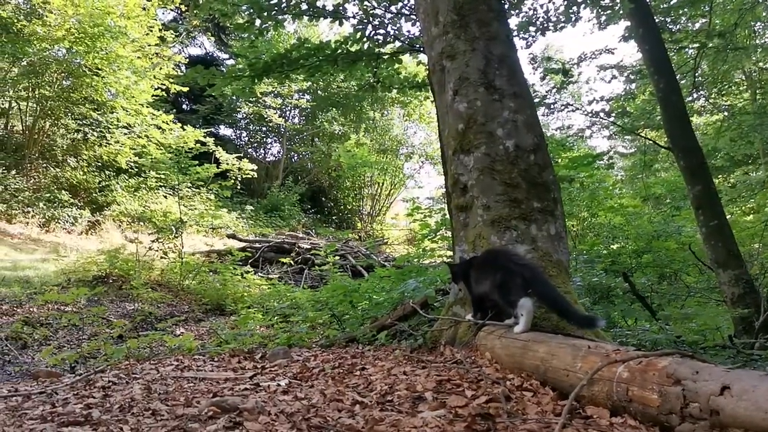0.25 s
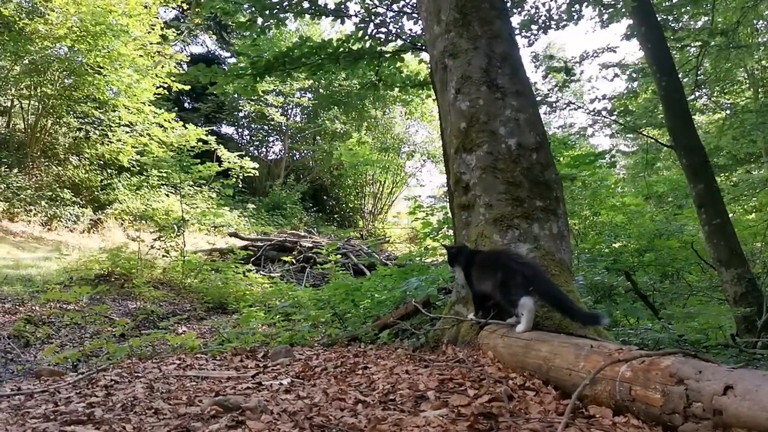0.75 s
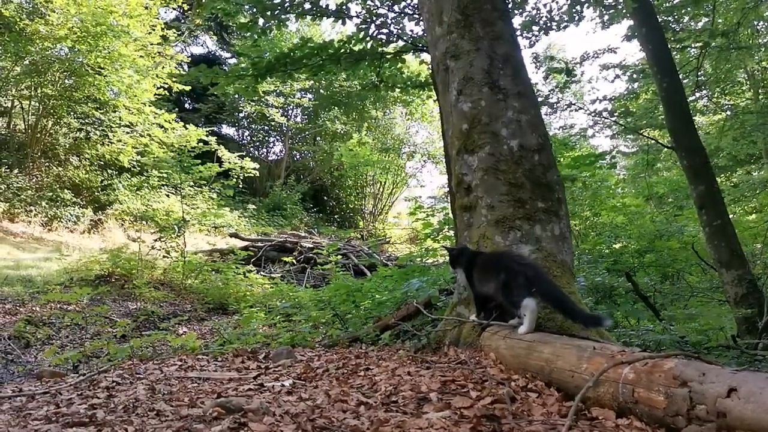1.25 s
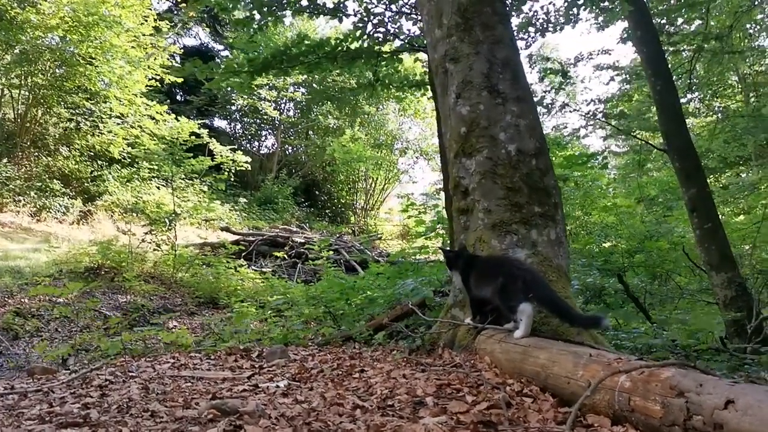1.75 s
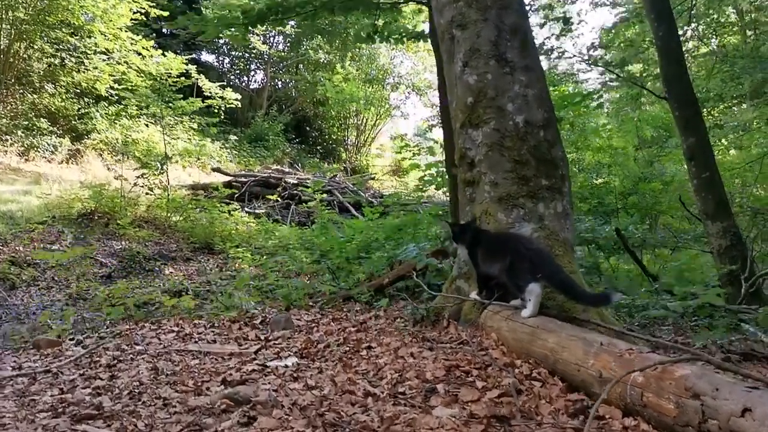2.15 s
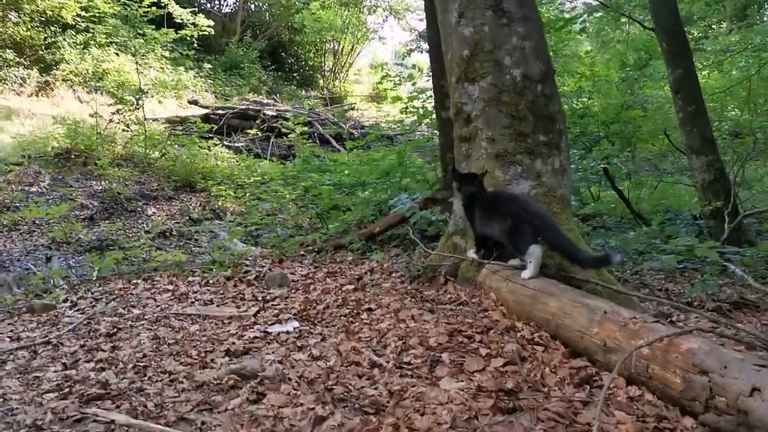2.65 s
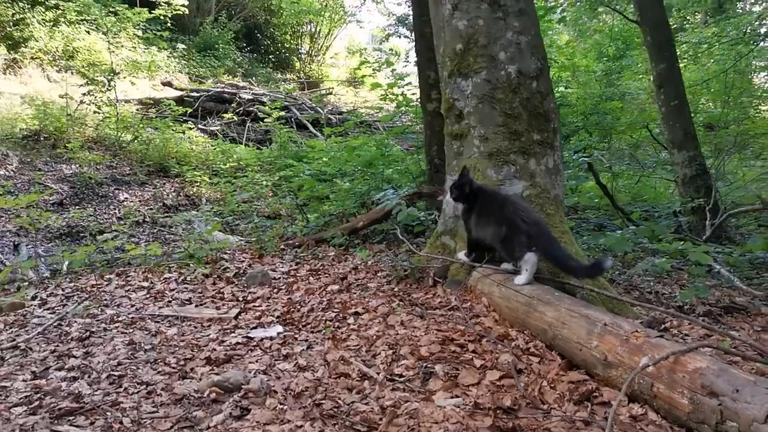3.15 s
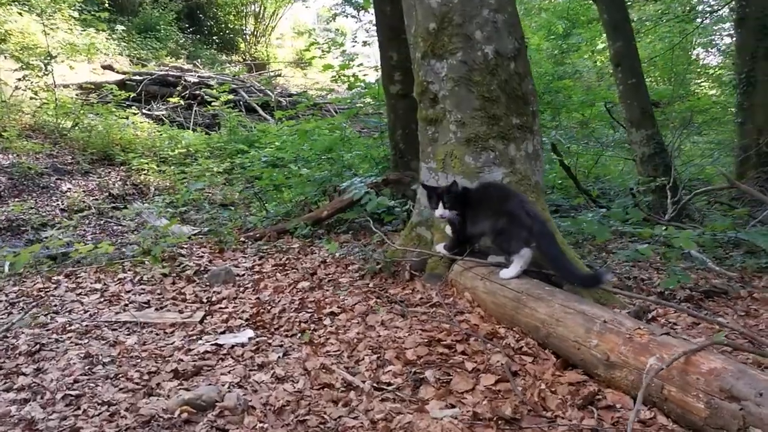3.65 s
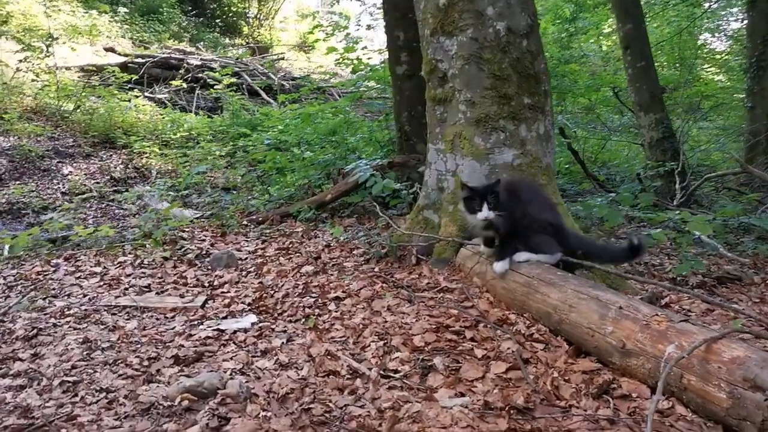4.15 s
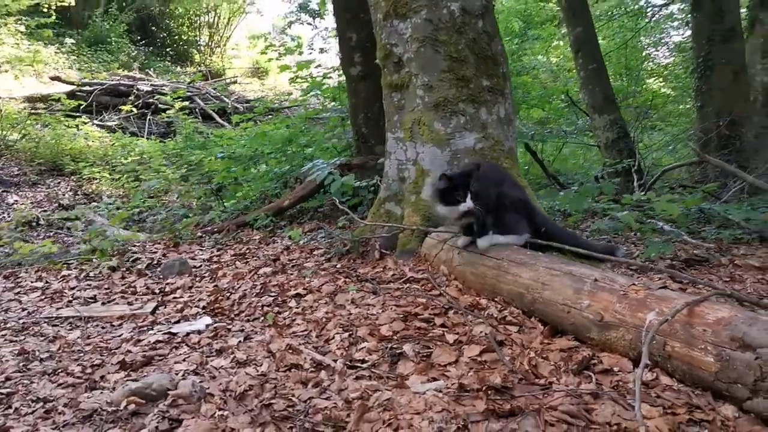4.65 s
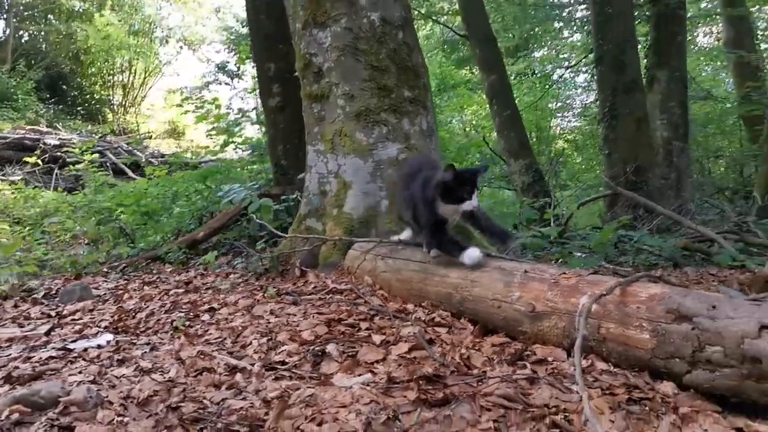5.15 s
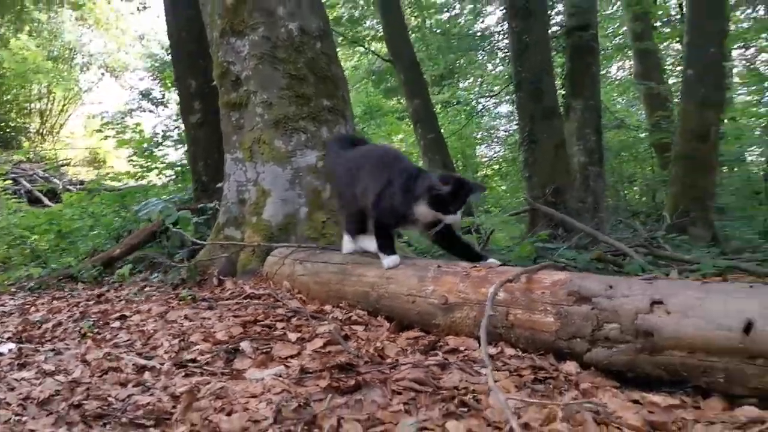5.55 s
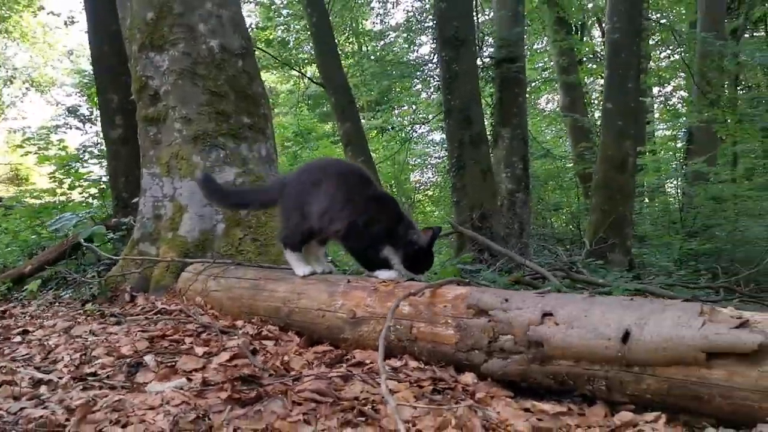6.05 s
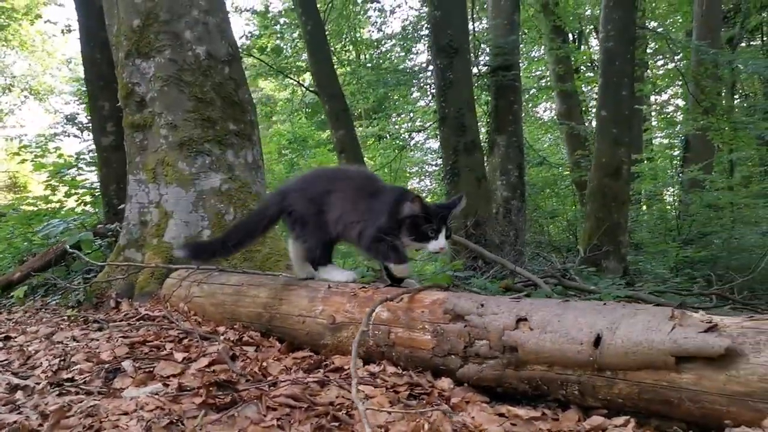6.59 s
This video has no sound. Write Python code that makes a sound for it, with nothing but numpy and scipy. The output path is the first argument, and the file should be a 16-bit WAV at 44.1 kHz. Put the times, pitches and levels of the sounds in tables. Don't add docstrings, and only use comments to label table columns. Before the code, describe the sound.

Outdoors among trees, a hand-held stereo recorder picks up soft low wind and a wash of foliage. A warbler whistles and small birds chirp with a diffuse woodland echo. Dull knocks on the case come early, the sharpest just after one second. From about two to nearly six seconds, close dry leaves crackle with hollow pops and brittle snaps, beneath finch song and buzzy calls. It ends quieter, with faint birds.

```python
import sys
import numpy as np
from scipy import signal
from scipy.fft import rfft, irfft, next_fast_len
from scipy.io import wavfile

SR = 44100
rng = np.random.default_rng(int(sys.argv[2]) if len(sys.argv) > 2 else 0)


def store_pcm(level_fs):
    pcm = np.round(np.clip(level_fs, -1, 1) * 32767).astype(np.int16)
    wavfile.write(sys.argv[1], SR, np.atleast_2d(pcm).T)


def undo_db(level):
    steps = np.asarray(level, float) / 20
    return 10 ** steps


N = 300762
PAD = next_fast_len(N + SR)
BINS_HZ = np.maximum(np.arange(PAD // 2 + 1) * SR / PAD, 1)

# time in seconds, level in dB.
GUSTS = [(0.0, -69), (0.42, -68.5), (0.7, -60.5), (1.05, -69), (1.71, -60), (2.11, -57.5), (2.55, -65.5),
         (3.3, -63), (3.76, -66), (4.05, -62.5), (4.67, -61.5), (4.82, -56.5), (5.17, -65.5), (5.58, -66),
         (5.98, -61), (6.82, -69)]
# frequency in Hz, density in dB per Hz.
RUMBLE_COLOUR = [(8.8, -42), (15, 1), (70, 0), (106, -4), (134, -7), (270, -19), (336, -18), (500, -21),
                 (650, -57.5), (1100, -120)]
# frequency in Hz, density in dB per Hz.
WOOD_COLOUR = [(88, -41), (150, -3), (303, -9), (1120, -10), (1440, -11.5), (2210, -11), (3020, -10.5),
               (3660, -7.5), (4540, -19), (5630, -17), (7250, -19), (8810, -36), (11800, -39), (14300, -39),
               (15800, -59)]
# time in seconds, gain in dB.
CHORUS_GAIN = [
    (0, 7.5),
    (.6, -1),
    (1.4, -1),
    (1.8, 4.5),
    (2.3, 15.5),
    (3.8, 4.5),
    (5.0, 14),
    (5.9, 6.5),
    (6.4, 13.5),
    (6.82, 10),
]
# start in seconds, length in seconds, start pitch in Hz,
# end pitch in Hz, peak in dB.
WARBLER_HOLDS = [(0.268, 0.023, 2290, 2310, -56), (0.725, 0.054, 3760, 3170, -55),
                 (.772, 0.04, 3200, 3057, -55.5), (0.855, 0.06, 3040, 3250, -57.5),
                 (.42, 0.048, 2770, 3130, -61), (.24, 0.047, 2980, 3330, -64),
                 (1.11, 0.37, 2012, 2052, -69.5), (1.31, 0.058, 3410, 2980, -57),
                 (1.4, 0.069, 3660, 3576, -51.5), (1.725, 0.15, 2904, 3091, -55.5),
                 (1.75, 0.11, 2340, 2440, -63.5), (2.075, 0.071, 3870, 4080, -61.5),
                 (2.15, 0.051, 3920, 3620, -54), (2.92, 0.17, 1858, 2023, -59.5),
                 (3.68, 0.079, 2600, 2013, -53.5), (3.77, 0.11, 3042, 3363, -45),
                 (5.62, 0.11, 4050, 3860, -67), (5.74, 0.14, 3200, 3285, -67.5),
                 (6.42, 0.28, 3550, 3580, -74.5), (1.95, 0.05, 3010, 2810, -60)]
WARBLER_SLIDES = [(0, 0.052, 4034, 3990, -58.5), (0, 0.048, 2873, 2950, -64),
                  (0.083, 0.085, 3380, 3564, -52), (0.15, 0.066, 3780, 2890, -54),
                  (0.36, 0.051, 3074, 2605, -53), (0.487, 0.042, 3673, 3670, -55),
                  (0.93, 0.036, 4090, 3710, -56.5), (1.0, 0.17, 2870, 2934, -64),
                  (1.31, 0.046, 4420, 4200, -65.5), (1.527, 0.053, 2720, 2475, -54),
                  (1.88, 0.05, 3500, 2860, -58.5), (2.265, 0.06, 2510, 2756, -60),
                  (3.6, 0.043, 3270, 3100, -45.5), (6.0, 0.14, 2850, 3040, -64.5),
                  (6.5, 0.063, 2780, 2650, -68.5), (6.63, 0.098, 2720, 2740, -72.5),
                  (6.05, 0.15, 5320, 5390, -66)]
# start in seconds, length in seconds, start pitch in Hz,
# end pitch in Hz, peak in dB.
CROWN_CALLS = [(0.0, 0.054, 7450, 7200, -56.5), (0.58, 0.041, 5390, 5790, -61), (.76, .04, 8400, 8500, -78),
               (.91, 0.056, 8430, 9160, -77), (.96, 0.037, 9000, 8800, -81), (3.8, 0.16, 7630, 6950, -63),
               (1.064, 0.05, 5850, 6780, -52), (1.068, 0.055, 5350, 6630, -50.5),
               (1.03, .07, 7500, 7570, -72), (1.3, 0.06, 8450, 8000, -81), (4.235, 0.025, 7500, 7400, -62),
               (6.06, 0.048, 5700, 6500, -66), (6.74, .075, 6050, 5760, -68), (1.3, 0.052, 7200, 7340, -74),
               (1.345, 0.043, 7150, 6380, -65), (1.75, 0.062, 4820, 5160, -69),
               (2.008, 0.05, 7350, 6730, -50), (2.04, .035, 6700, 5900, -52),
               (5.83, 0.086, 7200, 7180, -68.5), (5.84, 0.072, 5720, 5900, -66.5),
               (6.06, 0.044, 7100, 7760, -60.5), (6.3, 0.072, 5630, 5300, -68),
               (6.46, 0.14, 5400, 5400, -64), (6.63, 0.1, 5820, 5720, -64.5), (6.44, 0.24, 7200, 7170, -64),
               (6.62, 0.19, 7200, 7550, -67)]
# start in seconds, length in seconds, top pitch in Hz, peak in dB.
ARCHED_CALLS = [
    (0.718, 0.12, 7580, -63.5),
    (0.888, 0.112, 7660, -65.5),
    (1.1, 0.055, 7720, -60),
]
# start in seconds, peak in dB.
ALARM_CHIPS = [
    (0.064, -39),
    (0.1706, -41.5),
]
# time in seconds,
# signed size, knock in Hz, boom against the knock in dB.
FINGER_KNOCKS = [(0.629, -0.017, 413, -7.5), (0.686, .006, 295, 1), (1.283, 0.1, 630, -9),
                 (1.2868, -0.26, 432, -18), (1.6405, -0.028, 403, -6.5), (1.7391, 0.019, 607, 0),
                 (1.866, 0.027, 520, -9), (.14, .002, 198, 11.5), (1.945, .002, 199, 11),
                 (1.977, .003, 195, 11.5), (2.04, .002, 199, 12), (2.415, .002, 200, 15),
                 (4.287, .003, 197, 10.5), (2.112, 0.036, 510, -15), (2.2167, -0.23, 560, -9.5),
                 (2.388, .002, 200, 13.5), (2.931, .003, 194, 13), (3.354, 0.08, 950, -21),
                 (3.44, 0.068, 860, -21.5), (4.088, .004, 190, 10), (4.744, 0.0098, 338, -0.5),
                 (5.256, 0.0082, 317, 1)]
# time in
# seconds, pitch in Hz, peak in dB.
HOLLOW_POPS = [(3.108, 1510, -41), (3.176, 610, -34.5), (3.223, 1900, -44), (3.265, 1310, -44),
               (3.281, 800, -35.5), (3.291, 1600, -38), (3.311, 1100, -44), (3.382, 800, -41),
               (3.398, 1500, -33), (3.407, 1000, -35), (3.424, 1150, -29.5), (3.496, 1510, -42),
               (3.985, 1450, -41), (4.137, 1600, -37), (4.712, 1500, -38), (4.735, 1400, -38),
               (4.784, 1200, -41), (4.797, 1300, -34.5), (4.845, 1000, -41), (4.894, 1100, -30.5),
               (4.965, 1800, -44), (5.215, 1730, -43), (5.506, 1800, -29.5), (5.618, 1200, -47),
               (2.05, 740, -49), (1.267, 1000, -55), (3.354, 7400, -23), (.629, 1500, -43),
               (.631, 890, -44), (1.286, 3020, -40), (3.198, 1800, -39), (5.1068, 1630, -32),
               (5.1069, 3300, -25), (3.754, 5200, -52)]
# time in seconds, low body in dB, crack in dB.
TWIG_BREAKS = [(1.8758, -67, -54), (1.9295, -60, -42), (2.3091, -51, -38), (3.4965, -42, -42),
               (3.9846, -44, -50), (4.7648, -39, -31), (4.9887, -50, -41), (5.1068, -27, -22),
               (5.1738, -51, -50), (5.215, -43, -46), (5.5435, -35, -31), (0.6727, -68, -63),
               (5.6784, -68, -54), (5.751, -60, -47), (6.1872, -54, -56), (4.7715, -48, -41),
               (4.7845, -50, -42), (4.806, -48, -42), (4.828, -52, -44), (4.9145, -55, -44),
               (5.2245, -50, -47), (5.4165, -54, -43), (5.4452, -44, -35), (5.5155, -50, -38),
               (5.577, -50, -46), (3.121, -50, -41), (3.415, -52, -41), (3.486, -54, -44),
               (3.649, -56, -44), (4.31, -62, -52), (4.333, -60, -50), (5.0955, -52, -48)]
# time in seconds, low body in dB, crack in dB.
STALK_BREAKS = [(2.1614, -52, -62), (2.3185, -53, -46), (2.3871, -63, -52), (2.6923, -57, -44),
                (2.802, -58, -70), (3.1854, -43, -50), (3.2814, -44, -38), (3.3542, -41, -41),
                (3.5574, -39, -37), (4.1359, -48, -52), (4.1655, -50, -45), (4.4268, -53, -37),
                (4.734, -49, -47), (4.7961, -44, -43), (4.9345, -35, -32), (5.0263, -53, -38),
                (5.0749, -56, -45), (5.0787, -42, -34), (5.1018, -35, -29), (5.1286, -40, -38),
                (5.3767, -47, -44), (5.4034, -50, -41), (5.4271, -44, -38), (5.4474, -43, -31),
                (6.2979, -54, -45), (6.4136, -50, -43)]
# low edge in Hz, high edge in Hz.
BREAK_BANDS_HZ = [(280, 4000), (4000, 7600), (8500, 15000)]
# start in seconds, length in seconds, pitch in Hz, warble depth in Hz, peak in dB.
BUZZY_NOTES = [(1.101, 0.034, 6530, 200, -44.5), (2.0, 0.11, 6850, 545, -47), (2.04, 0.12, 5450, 475, -65),
               (2.946, 0.098, 2834, 240, -54), (3.1, 0.54, 3430, 599, -49), (3.13, .06, 3000, 120, -56),
               (3.24, .07, 3080, 130, -54), (3.439, 0.051, 3150, 120, -54.5), (3.619, 0.24, 2600, 404, -55),
               (3.96, 0.086, 3605, 470, -47), (4.118, 0.11, 5580, 470, -49), (3.4, 0.12, 3600, 532, -58),
               (4.368, 0.084, 4194, 313, -50.5), (4.355, 0.11, 6850, 440, -47),
               (6.065, 0.13, 7120, 610, -56), (6.185, 0.056, 3800, 220, -62.5),
               (7.3, 0.27, 7150, 390, -61.5), (5.6, .04, 2800, 231.5, -59), (3.925, 0.084, 4600, 570, -52),
               (4.3, .09, 5550, 150, -54), (4.27, 0.045, 2800, 324, -56), (5.95, 0.07, 3250, 160, -66)]
# start in seconds, hold in seconds, crackle in dB, low crunch in dB.
TREADS = [(2.317, 0.47, -75, -73.5), (2.49, 0.046, -63.5, -63), (3.122, 0.018, -59.5, -53.5),
          (3.157, 0.13, -65.5, -56.5), (3.277, .01, -61.5, -49.5), (3.383, 0.069, -61.5, -51.5),
          (3.477, 0.13, -61.5, -58.5), (3.7, 0.34, -80, -72), (4.108, 0.31, -73, -70),
          (4.403, 0.072, -68, -58), (4.632, 0.12, -70.5, -59.5), (4.754, 0.16, -63.5, -56.5),
          (4.957, 0.14, -70.5, -68.5), (5.179, 0.3, -71, -66.5), (5.436, 0.098, -61.5, -56.5),
          (5.54, 0.022, -65, -61.5), (5.734, 0.28, -83.5, -75)]
# frequency in Hz, density in dB per Hz.
CRACKLE_COLOUR = [(880, -33), (1500, -12), (2160, -20), (3570, -3), (3940, 1), (4300, -7), (5090, -4),
                  (7180, -5.5), (10700, -28.5), (12200, -37), (14900, -29), (15800, -56)]
# frequency in Hz, density in dB per Hz.
CRUNCH_COLOUR = [(150, -50), (250, -22), (285, -21), (480, -1.5), (2160, -1.5), (2400, 0), (3120, -2.5),
                 (5280, -120)]
LEAF_EDGES_HZ = [100, 900, 1700, 3000, 4500, 6000, 7600, 16000]
# delay in seconds, length in seconds, start pitch in Hz,
# end pitch in Hz, relative level in dB.
SYLLABLE_PARTS = [
    (0, 0.026, 6620, 4900, 0),
    (0.023, 0.0136, 5400, 7200, 1),
    (0.039, .04, 7200, 7340, -10),
    (0.05, .03, 4600, 4550, -3),
    (0.083, 0.03035, 4300, 3830, -7.5),
]
# start in seconds, peak in dB.
HIGH_SYLLABLES = [
    (2.446, -46.5),
    (2.595, -41),
    (2.744, -39),
]
# start in seconds, top pitch in Hz, peak in dB.
LOW_SYLLABLES = [
    (2.9, 4275, -42),
    (3.06, 4565, -41.5),
    (3.205, 4530, -47),
    (3.347, 5200, -45.5),
]
# start in seconds, peak in dB.
FLICKS = [
    (2.854, -48),
    (2.919, -44),
    (3.01, -42),
    (3.09, -39.5),
]
# start in seconds, length in seconds, start pitch in Hz, end pitch in Hz, peak in dB.
FLOURISH = [
    (2.346, 0.015, 5130, 4560, -47.5),
    (2.804, 0.083, 4790, 4590, -55),
    (2.819, 0.034, 4000, 3860, -46.5),
    (3.497, 0.074, 4280, 4250, -52),
    (3.905, 0.03, 4780, 4910, -42.5),
    (3.925, .02, 5140, 5360, -54),
    (3.926, 0.041, 4700, 3580, -47),
    (4.0, 0.1, 3360, 3880, -51.5),
]
# frequency in Hz, left over right in dB.
PORT_COLOUR = [(60, -8.5), (380, -2), (1140, -0.5), (2800, 6.5), (4970, -1), (7180, 16), (10400, 11.5),
               (13500, -7)]
# frequency in Hz, lead in radians.
PORT_LEAD = [(0, 0), (2840, 0.66), (3790, 2.5), (5940, 5), (6980, 8), (9560, 7), (11100, 10.5), (16000, 11)]


def rms_one(x):
    return x / np.sqrt(np.mean(x ** 2) + 1e-20)


def at_hz(points, hz):
    points_hz, values = np.transpose(points)
    return np.interp(np.log(hz), np.log(points_hz), values)


def at_time(points):
    s, level_db = np.transpose(points)
    return np.interp(np.arange(N) / SR, s, level_db)


def coloured(x, spectrum):
    gain = undo_db(at_hz(spectrum, BINS_HZ))
    return rms_one(irfft(rfft(x, PAD) * gain, PAD)[..., :N])


def drift(rate_hz):
    r = np.exp(-2 * np.pi * rate_hz / SR)
    slow = signal.lfilter([1], [1, -2 * r, r * r], rng.standard_normal(N + SR))
    return rms_one(slow[SR:])


def ring(hz, t60_s):
    t = np.arange(int(t60_s * SR)) / SR
    return np.sin(2 * np.pi * hz * t) * undo_db(-60 * t / t60_s)


def swell(hz, t60_s):
    mode = ring(hz, t60_s)
    cycles = np.arange(len(mode)) * hz / SR
    return mode * np.minimum(cycles / 0.95, 1)


def add(out, sound, s):
    i = round(s * SR)
    out[..., i:i + sound.shape[-1]] += sound[..., :N - i]


def placed(x, pan_db=0, lag_s=0):
    late = np.interp(np.arange(N) - lag_s * SR, np.arange(N), x)
    return np.array([x * undo_db(pan_db / 2), late * undo_db(-pan_db / 2)])


def trunks(x, t60_s, wet_db):
    t = np.arange(int(0.9 * SR)) / SR
    tail = rng.standard_normal((2, len(t))) * undo_db(-60 * t / t60_s) * (1 - np.exp(-t / 0.00065))
    tail = tail / np.sqrt(np.sum(tail ** 2, axis=1, keepdims=True))
    return undo_db(wet_db) * irfft(rfft(x, PAD) * rfft(tail, PAD), PAD)[:, :N]


def whistle(hz, level_db, edge):
    envelope = signal.windows.tukey(len(hz), np.clip(edge, 0, 1))
    return undo_db(level_db) * envelope * np.sin(2 * np.pi * np.cumsum(hz) / SR)


def bent(rows, rise_share, fall_share):
    notes = []
    for s, length_s, start_hz, end_hz, level_db in rows:
        share = rise_share if end_hz > start_hz else fall_share
        mid_hz = start_hz + share * (end_hz - start_hz)
        notes.append((s, length_s, start_hz, mid_hz, end_hz, level_db))
    return notes


def singer(notes, pan_db, lag_s, direct_db, t60_s, waver):
    out = np.zeros(N)
    wobble = 1 + waver * drift(100)
    for s, length_s, start_hz, mid_hz, end_hz, level_db in notes:
        u = np.linspace(-0.5, 0.5, int(length_s * SR))
        hz = mid_hz + (end_hz - start_hz) * u + 2 * (start_hz + end_hz - 2 * mid_hz) * u ** 2
        hz = hz * wobble[round(s * SR):][:len(u)]
        add(out, whistle(hz, level_db + 3.0, edge=0.31), s)
    out = out * undo_db(2.94 * drift(64))
    return undo_db(direct_db) * placed(out, pan_db, lag_s) + trunks(out, t60_s, wet_db=0)


def wind():
    lumps_db = 2.5 * drift(10)
    both, own = rng.standard_normal(N), rng.standard_normal((2, N))
    return undo_db(at_time(GUSTS) + 5.5 + lumps_db) * coloured(both + 0.92 * own, RUMBLE_COLOUR)


def wood():
    both, own = rng.standard_normal(N), rng.standard_normal((2, N))
    level_db = -62.5 + 0.77 * drift(9.8)
    wash = undo_db(level_db) * coloured(both + 0.75 * own, WOOD_COLOUR)
    bird_band = signal.butter(3, [4500, 8500], "band", fs=SR, output="sos")
    treble = signal.sosfiltfilt(bird_band, wash)
    return wash + treble * (undo_db(at_time(CHORUS_GAIN) + 0.5) - 1)


def warbler():
    notes = bent(WARBLER_HOLDS, 0.88, 0.88) + bent(WARBLER_SLIDES, 0.32, 0.32)
    return singer(notes, pan_db=-3, lag_s=-9e-5, direct_db=-4, t60_s=1.2, waver=0.005)


def crown_birds():
    notes = bent(CROWN_CALLS, 0.42, 0.42)
    for s, length_s, top_hz, level_db in ARCHED_CALLS:
        notes.append((s, length_s, top_hz * 0.95, top_hz, top_hz * 0.9, level_db))
    return singer(notes, pan_db=1, lag_s=0, direct_db=0, t60_s=0.6, waver=0.005)


def alarm_chips():
    rows = [(s, 0.008, 4500, 7300, level_db) for s, level_db in ALARM_CHIPS]
    return singer(bent(rows, 0.7, 0.7), pan_db=0, lag_s=0, direct_db=3, t60_s=0.6, waver=0.004)


def knocks():
    out = np.zeros((2, N))
    for s, size, hz, boom_db in FINGER_KNOCKS:
        knock = -2.3 * size * swell(hz, 5.8 / hz) * undo_db([[-5], [0]])
        tick = 0.5 * size * min(abs(size) / 0.082, 1) * ring(2.21 * hz, 0.0051) * undo_db([[1], [0]])
        boom = -size * undo_db(boom_db) * ring(73.5, 0.1) * undo_db([[-7], [0]])
        grip = 0.11 * size * swell(174, 0.037) * undo_db([[-4], [0]])
        add(out, knock, s - 0.5 / hz)
        add(out, tick, s)
        add(out, boom, s + 0.0017)
        add(out, grip, s + 0.0044)
    out[0] = np.roll(out[0], -round(0.00013 * SR))
    soft_fingertip = signal.butter(2, 2200, fs=SR, output="sos")
    return signal.sosfilt(soft_fingertip, out)


def pops():
    out = np.zeros(N)
    for s, hz, level_db in HOLLOW_POPS:
        add(out, undo_db(level_db + 11.5) * swell(hz, 3.9 / hz), s)
    return placed(out) + trunks(out, t60_s=0.05, wet_db=-14)


def snaps(breaks, top_db):
    out = np.zeros(N)
    cracks = rng.standard_normal((len(breaks), 300))
    cracks[:, 2] += 6
    cracks *= np.exp(-np.arange(300) / (0.0008 * SR))
    cracks = signal.lfilter([1, -0.85], [1], cracks)
    bands = []
    for edges_hz in BREAK_BANDS_HZ:
        band_pass = signal.cheby1(4, 1, edges_hz, "band", fs=SR, output="sos")
        bands.append(signal.sosfilt(band_pass, cracks))
    for k, (s, body_db, crack_db) in enumerate(breaks):
        for level_db, band in zip((body_db, crack_db, crack_db + top_db), bands):
            add(out, undo_db(level_db - 3.3) * rms_one(band[k]), s)
    return placed(out) + trunks(out, t60_s=0.016, wet_db=-17.5)


def buzzer():
    out = np.zeros(N)
    warble_hz = 130 + 45 * drift(60)
    warble = np.sin(2 * np.pi * np.cumsum(warble_hz) / SR) + 0.412 * drift(186.7)
    for s, length_s, hz, depth_hz, level_db in BUZZY_NOTES:
        path_hz = hz + depth_hz * warble[round(s * SR):][:int(length_s * SR)]
        add(out, whistle(path_hz, level_db + 6.5, edge=0.35), s)
    return undo_db(-5) * placed(out) + trunks(out, t60_s=0.7, wet_db=0)


def grains(per_s, spread_db):
    sizes = undo_db(spread_db * np.minimum(rng.exponential(1, N), 5)) * rng.choice([-1, 1], N)
    return sizes * (rng.random(N) < per_s * undo_db(5 * drift(25)) / SR)


def litter(per_s, spread_db, shared):
    out = shared * grains(per_s, spread_db)
    for edges_hz in zip(LEAF_EDGES_HZ, LEAF_EDGES_HZ[1:]):
        leaf_size = signal.butter(2, edges_hz, "band", fs=SR, output="sos")
        out = out + signal.sosfilt(leaf_size, grains(per_s, spread_db))
    return out


def leaves():
    s, hold_s, crackle_db, crunch_db = np.transpose(TREADS)[..., None]
    t = np.arange(N) / SR
    press_db = 493 * np.maximum(s - t, 0)
    settle_db = 124 * np.maximum(t - s - hold_s, 0)
    away_db = press_db + settle_db
    high = undo_db(np.max(crackle_db - away_db, axis=0))
    low = undo_db(np.max(crunch_db - away_db, axis=0))
    crackle = undo_db(19.0) * high * coloured(litter(1100, spread_db=4.0, shared=0.67), CRACKLE_COLOUR)
    crunch = undo_db(3.5) * low * coloured(litter(650, spread_db=4.0, shared=0.51), CRUNCH_COLOUR)
    near = crackle + crunch
    return placed(near) + trunks(near, t60_s=0.063, wet_db=-5.5)


def finch():
    notes, answers = list(FLOURISH), []
    for s, level_db in HIGH_SYLLABLES:
        for delay_s, length_s, start_hz, end_hz, more_db in SYLLABLE_PARTS:
            notes.append((s + delay_s, length_s, start_hz, end_hz, level_db + more_db))
    for s, top_hz, level_db in LOW_SYLLABLES:
        notes.append((s, 0.047, top_hz, top_hz * 0.655, level_db))
        answers.append((s + 0.066, 0.0653, 2870, 3180, level_db - 5))
    for s, level_db in FLICKS:
        notes.append((s, 0.0126, 5900, 7200, level_db))
    song = bent(notes, rise_share=0.9, fall_share=0.56) + bent(answers, 0.622, 0.622)
    return singer(song, pan_db=-0.5, lag_s=0, direct_db=-5, t60_s=0.55, waver=0.02)


def scene():
    air = wind() + wood()
    birds = warbler() + crown_birds() + alarm_chips() + buzzer() + finch()
    ground = pops() + snaps(TWIG_BREAKS, top_db=-37) + snaps(STALK_BREAKS, top_db=-21) + leaves()
    return air + birds + knocks() + ground


def top_cut(x):
    return signal.sosfilt(signal.butter(12, 16480, fs=SR, output="sos"), x)


def record(dry):
    power_ratio = undo_db(2 * at_hz(PORT_COLOUR, BINS_HZ))
    left = np.sqrt(2 * power_ratio / (1 + power_ratio))
    right = np.sqrt(2 / (1 + power_ratio))
    turn = np.exp(0.5j * np.interp(BINS_HZ, *np.transpose(PORT_LEAD)))
    ports = np.array([left * turn, right / turn])
    mix = irfft(rfft(dry, PAD) * ports, PAD)[:, :N]
    return top_cut(mix)


dry = scene()
out = record(dry)
store_pcm(out)
```